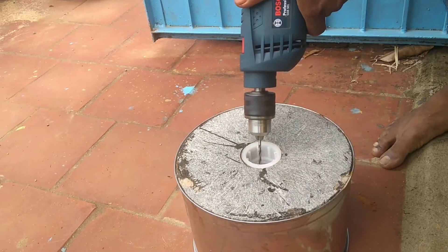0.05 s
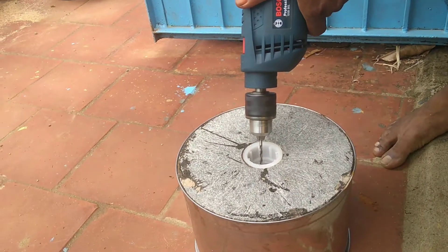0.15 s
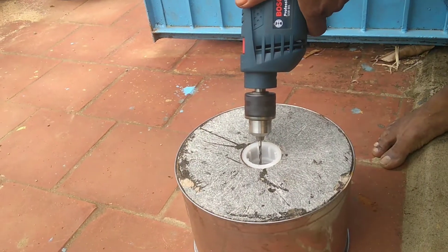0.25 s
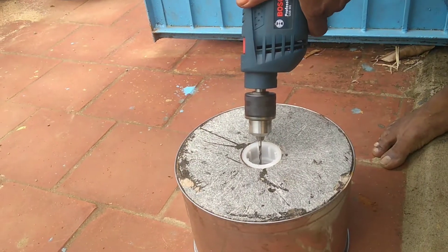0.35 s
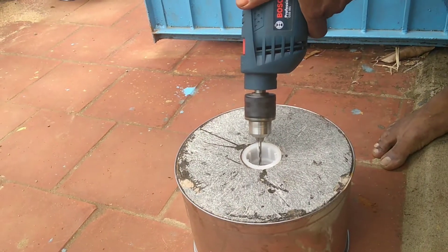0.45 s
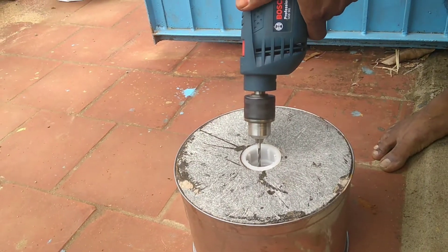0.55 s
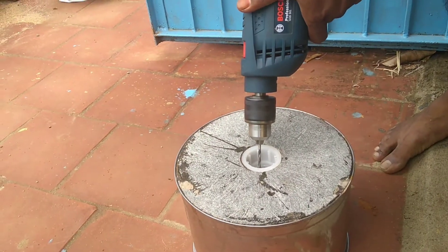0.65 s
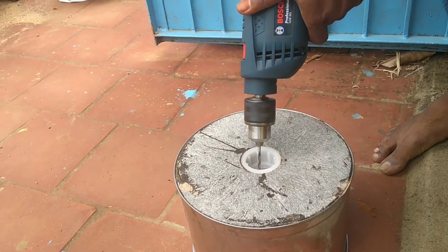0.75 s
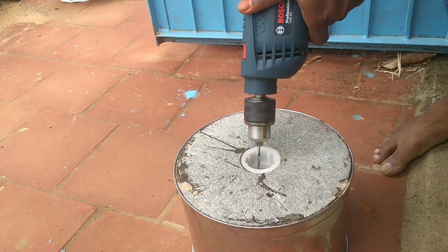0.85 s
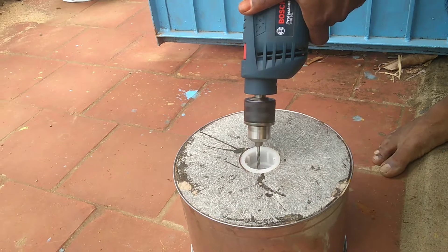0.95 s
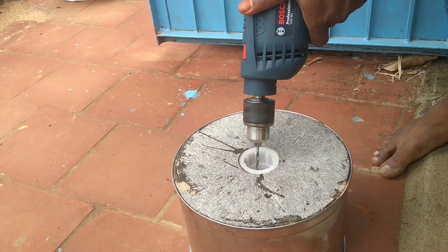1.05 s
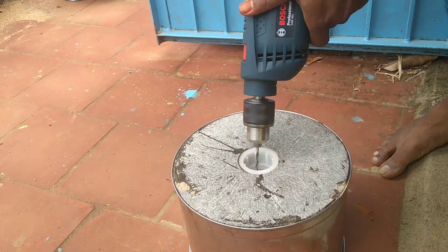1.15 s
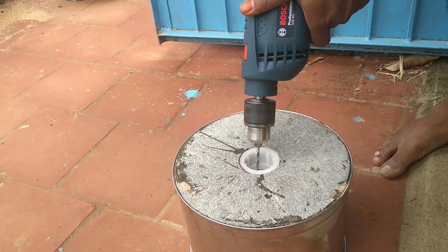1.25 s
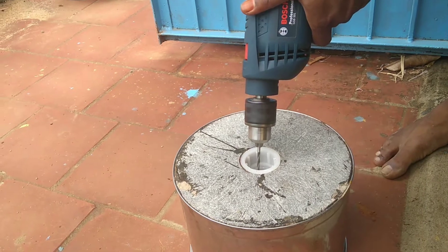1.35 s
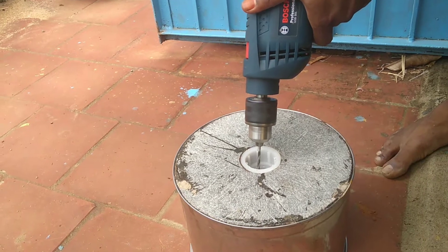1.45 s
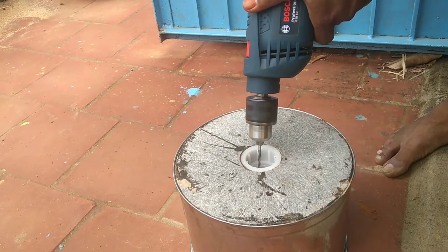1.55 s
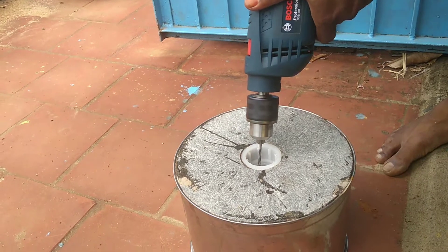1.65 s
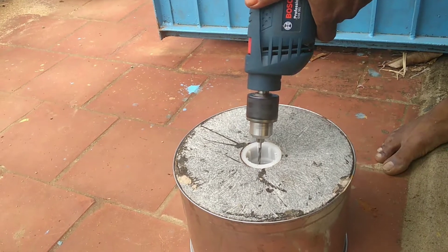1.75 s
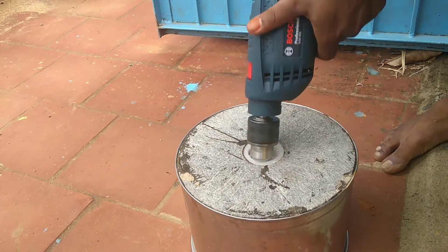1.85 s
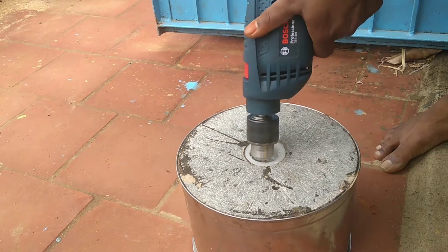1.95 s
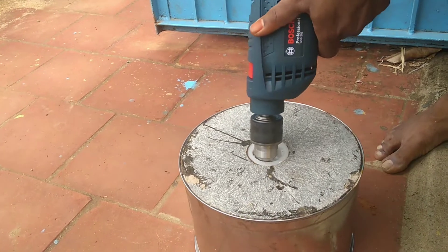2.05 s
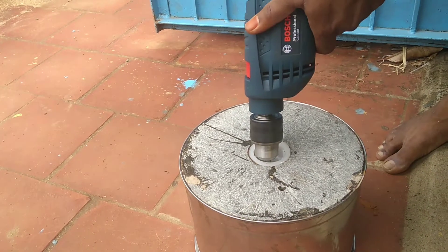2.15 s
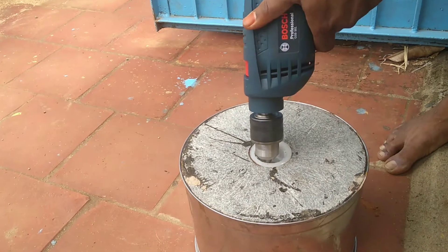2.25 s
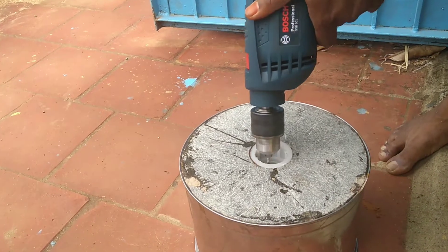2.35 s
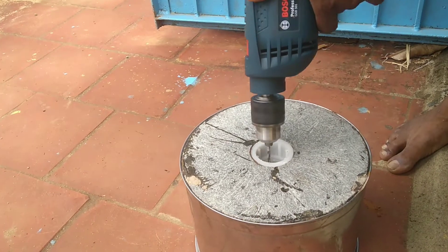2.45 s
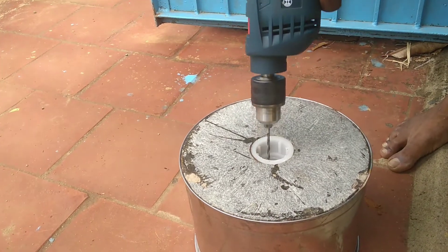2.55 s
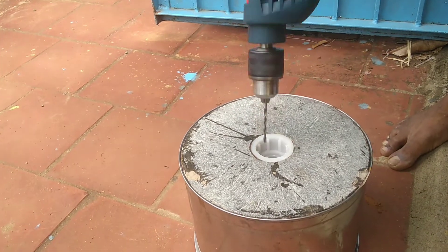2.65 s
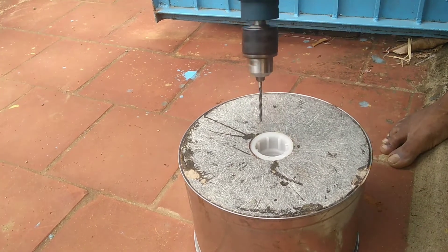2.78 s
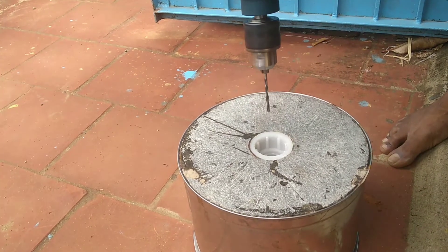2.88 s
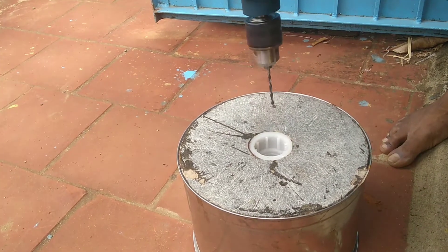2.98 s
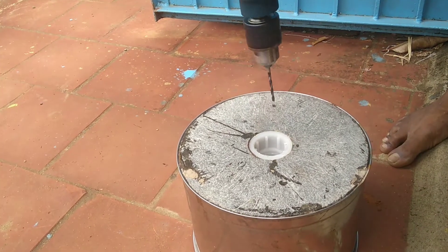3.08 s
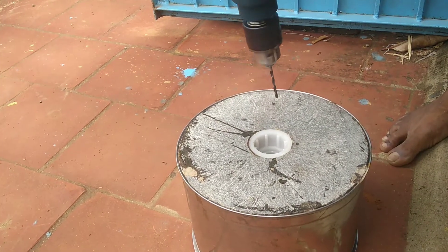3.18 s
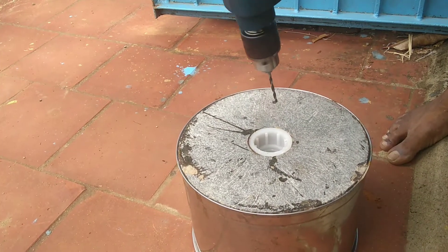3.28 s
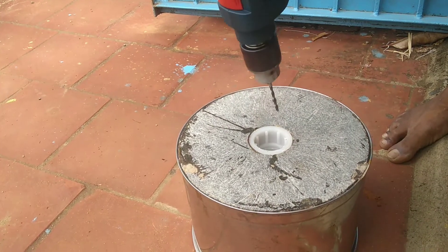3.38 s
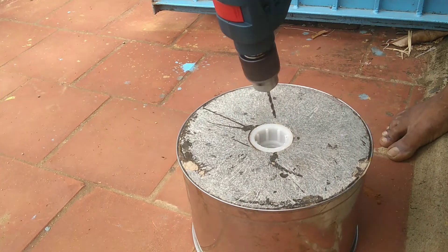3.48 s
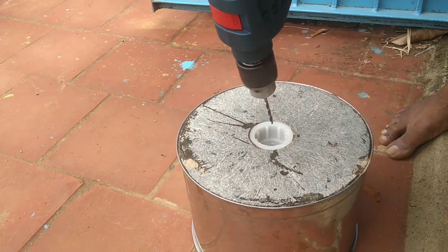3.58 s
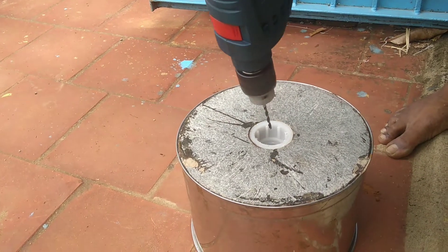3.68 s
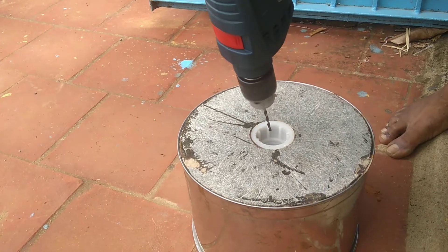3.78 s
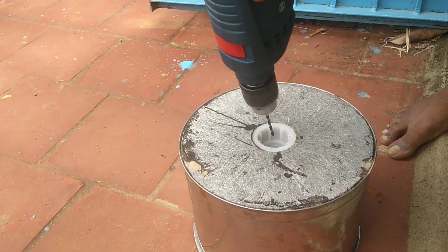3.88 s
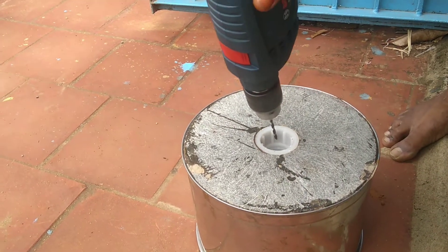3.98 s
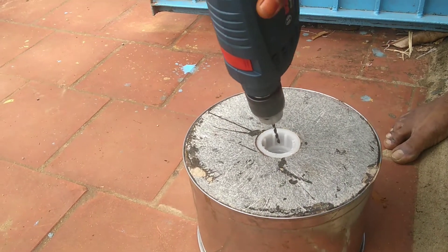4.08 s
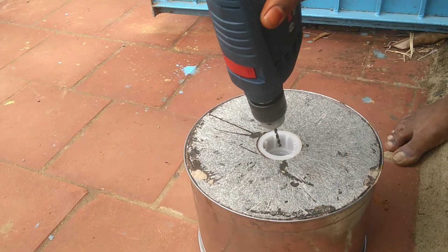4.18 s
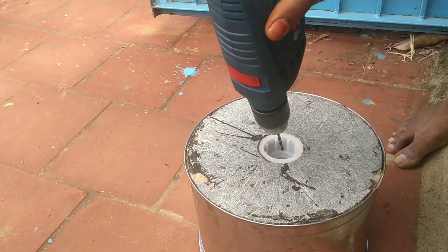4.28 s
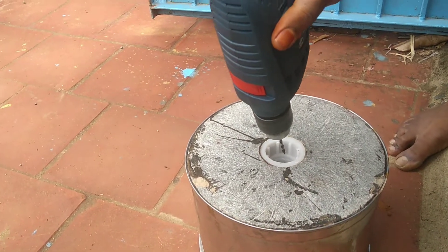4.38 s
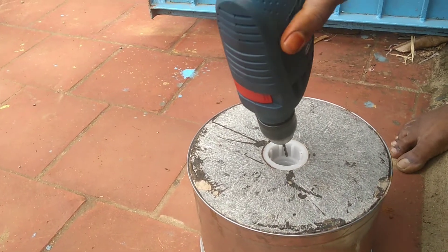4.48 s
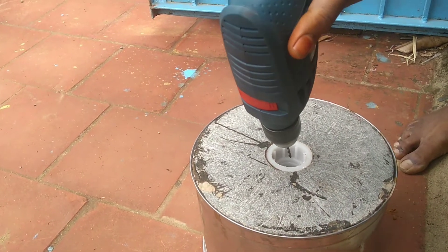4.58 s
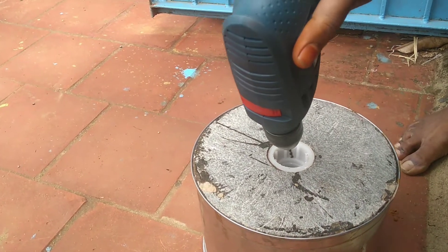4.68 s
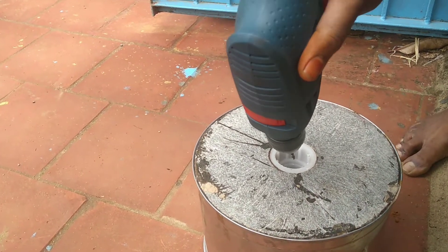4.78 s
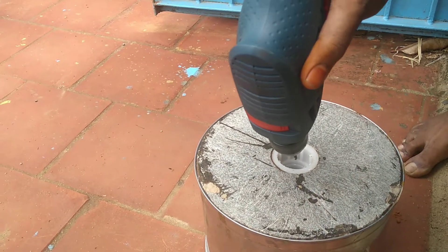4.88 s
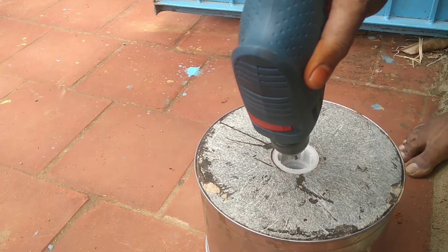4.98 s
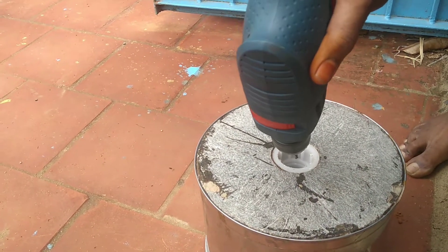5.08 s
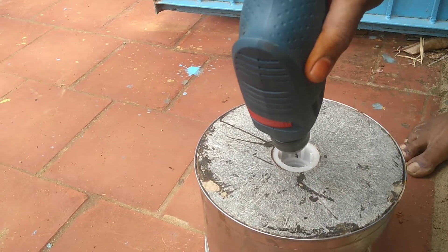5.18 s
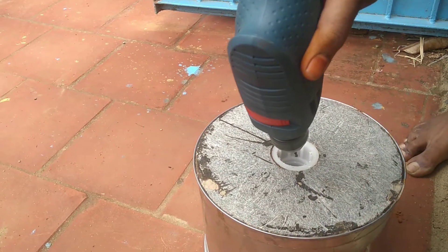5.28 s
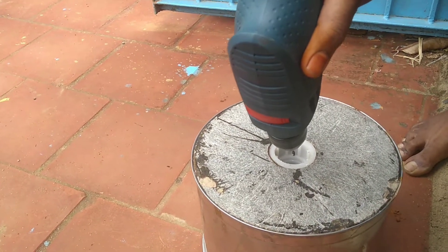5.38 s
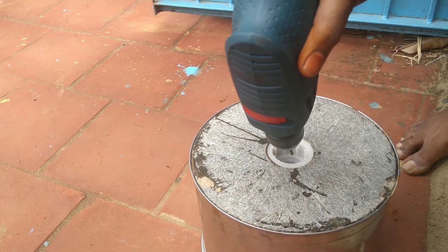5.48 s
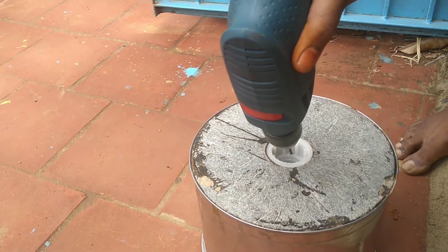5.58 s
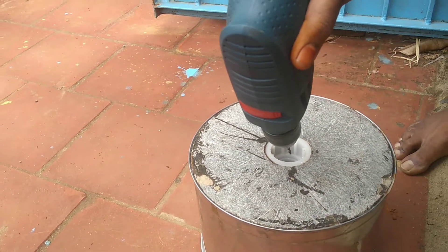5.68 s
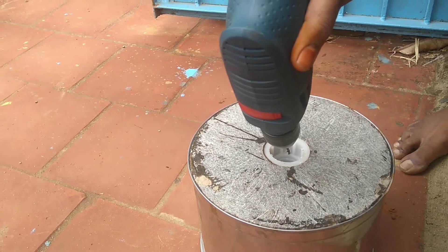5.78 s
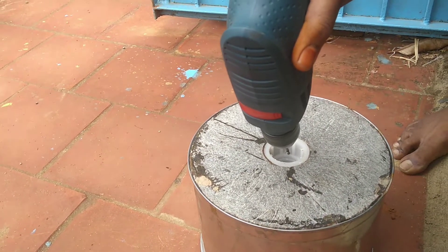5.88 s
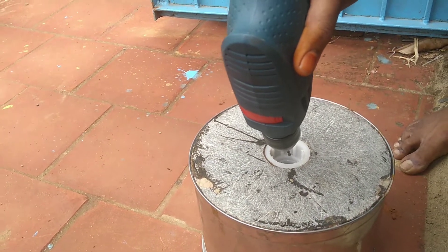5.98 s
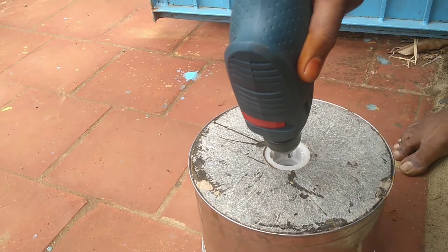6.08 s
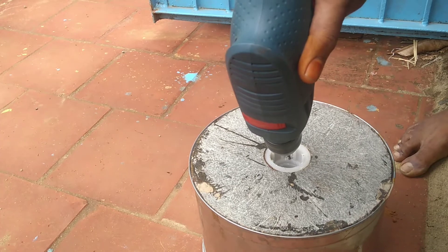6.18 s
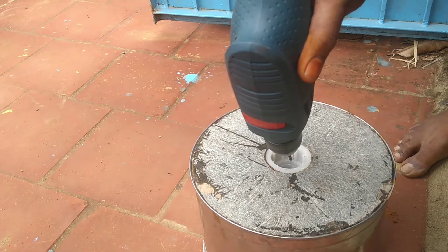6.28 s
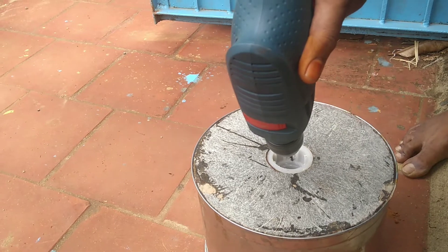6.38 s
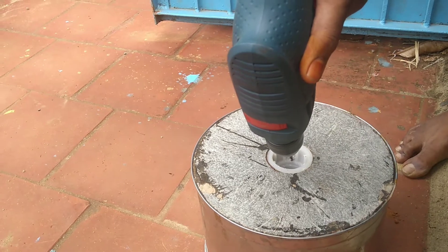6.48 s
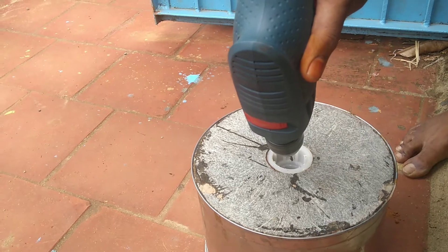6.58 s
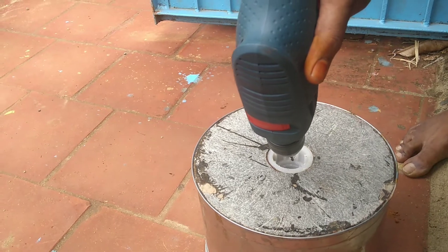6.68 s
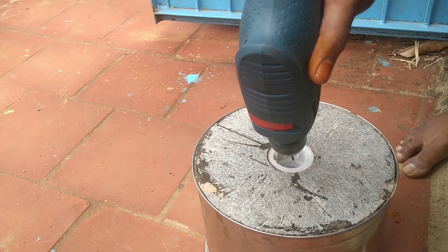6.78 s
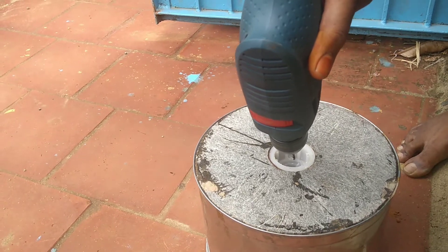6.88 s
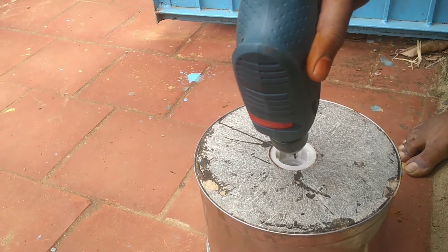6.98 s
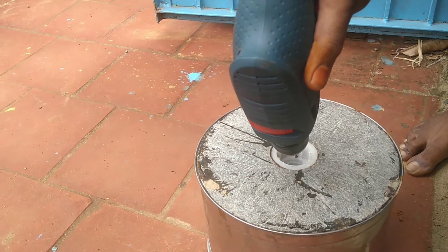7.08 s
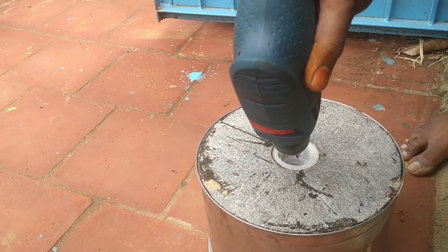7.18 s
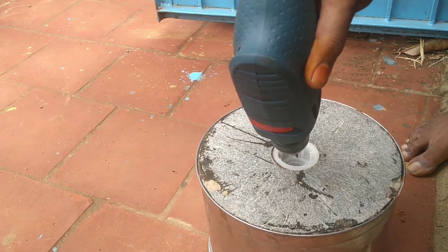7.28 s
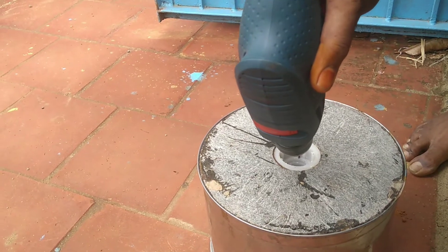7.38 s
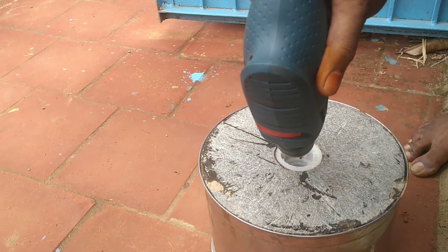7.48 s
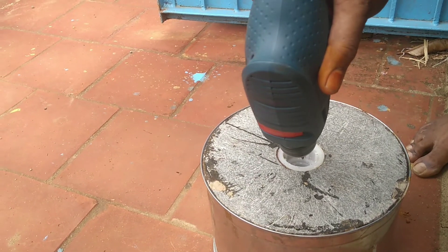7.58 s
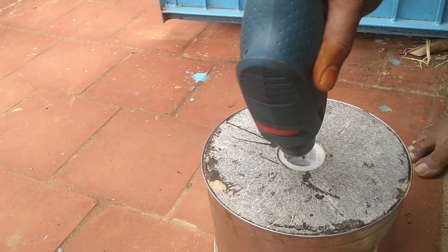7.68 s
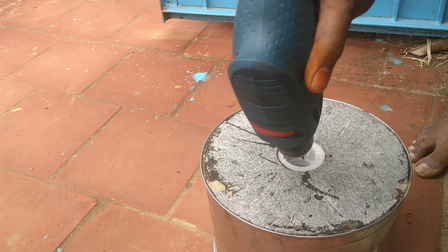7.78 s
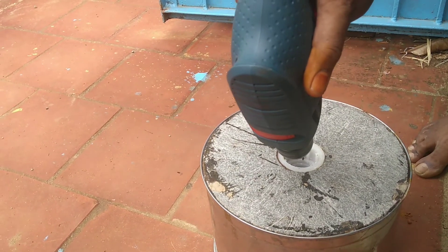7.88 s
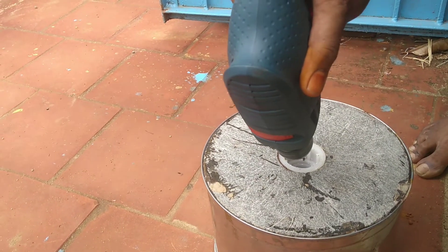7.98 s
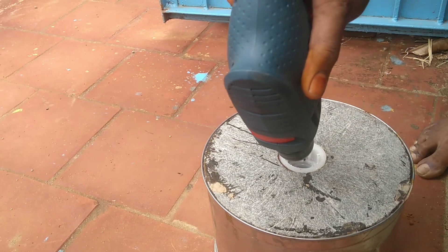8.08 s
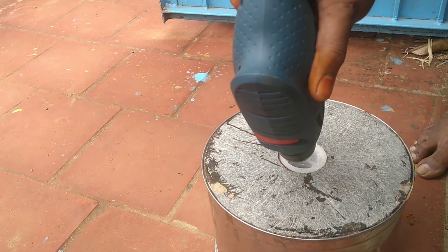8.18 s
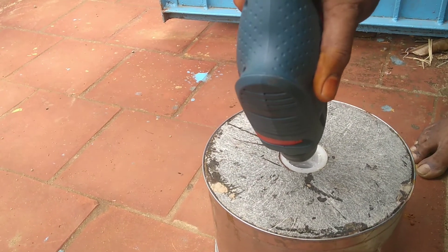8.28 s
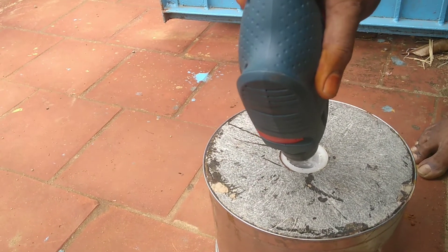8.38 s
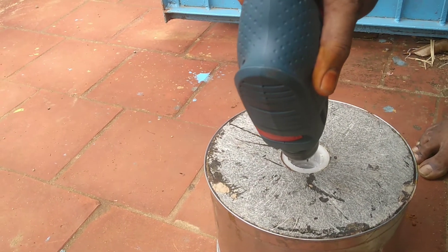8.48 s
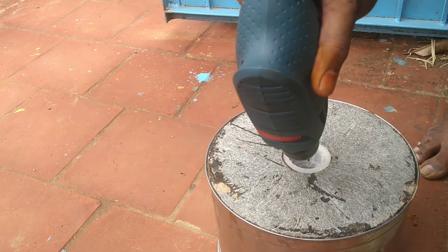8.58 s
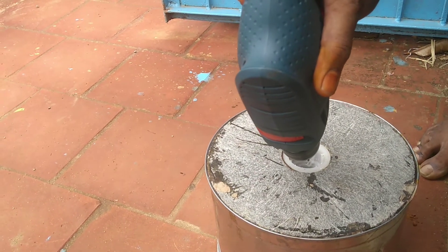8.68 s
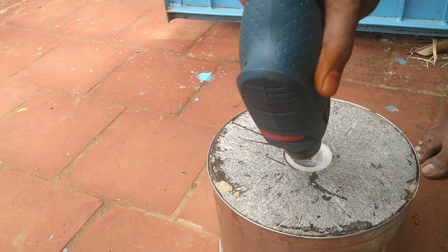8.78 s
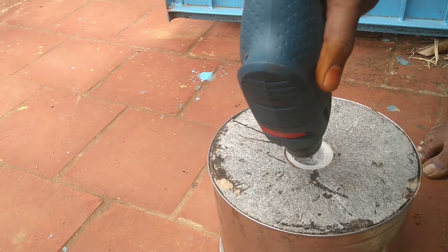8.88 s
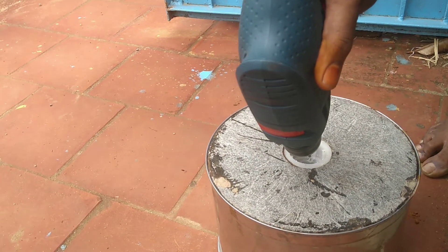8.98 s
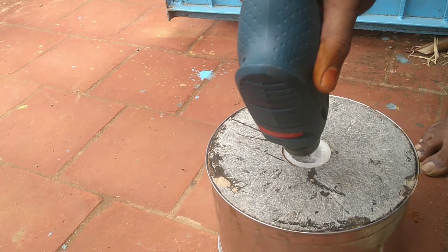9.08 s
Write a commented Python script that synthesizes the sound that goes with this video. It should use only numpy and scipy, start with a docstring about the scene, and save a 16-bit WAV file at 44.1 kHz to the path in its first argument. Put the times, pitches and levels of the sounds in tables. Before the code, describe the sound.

Close handheld electric drill whirring with gear whine and gritty scraping, winding down, clattering sharply back up with a squeal, then labouring under load.

```python
"""On a tiled floor, a mains drill works its bit into the hub of a stone-like drum, close to a phone.
The trigger is let go, the motor coasts far down, kicks back to full speed, sags again and partly recovers.
Noise bursts at the motor's pace make gear rattle, scrape and hiss; sines at multiples of its speed make
gear whine, fan whistle, squeal and hum. Filtered noise makes the drum's drones and groans, fading sines
its knocks, and short swelling cycles the soft handling thuds. Echoes mix into the left channel."""
import sys
import numpy as np
from scipy import signal
from scipy.fft import rfft, irfft
from scipy.io import wavfile
from scipy.ndimage import map_coordinates

SR = 44100
rng = np.random.default_rng(int(sys.argv[2]) if len(sys.argv) > 2 else 0)


def waveform_to_disk(signal):
    """Save audio, clipped to [-1, 1], as 16-bit WAV at the path in sys.argv[1]."""
    frames = np.transpose(np.atleast_2d(signal))
    scaled = np.clip(frames, -1, 1) * 32767
    samples = np.round(scaled).astype(np.int16)
    wavfile.write(sys.argv[1], SR, samples)


N = 403074
TIME = np.arange(N) / SR  # seconds
FREQS_HZ = np.maximum(np.fft.rfftfreq(N, 1 / SR), 1)

# Motor speed while the trigger is held. Each row: time in seconds, speed in turns per second (Hz).
HELD_SPEED = [(0, 418.4), (.27, 409), (.59, 450.7), (.96, 469.2), (1.35, 476.7), (1.8, 418.4), (2.11, 415),
              (2.17, 439.5), (2.32, 429), (2.5, 383.3), (5.74, 442), (5.97, 425), (6.3, 410), (6.8, 400.5),
              (7.35, 398), (7.66, 344.5), (8.1, 305.5), (8.22, 305), (8.44, 342.5), (8.62, 366),
              (8.85, 381), (9.14, 389)]
RELEASE_S, RESTART_S, FULL_SPEED_S = 2.5, 5.175, 5.74
# Slowing by dry drag, and the speed at which air drag equals it.
DRY_DRAG_HZ_PER_S, AIR_DRAG_HZ = 95.4, 363
SPIN_UP_S, FREE_SPEED_HZ, WORKING_HZ = .195, 466, 400
FAN_BLADES, PINION_TEETH, CROWN_TEETH = 39, 4, 42
# The hand swings the drill round, from its side to its back, between these times.
TURN_FROM_S, TURN_TO_S = 2.8, 3.76

# How hard the drill works. Each row: time in seconds, grinding level in dB.
EFFORT = [(0.0, -27), (0.15, -30), (0.25, -27.5), (0.58, -31), (1.07, -24.5), (1.63, -29), (1.88, -25.5),
          (1.99, -32.5), (2.49, -29), (2.92, -31.5), (3.89, -27), (3.92, -26), (4.02, -27), (4.2, -26),
          (4.38, -33.5), (4.76, -31.5), (5.14, -37), (5.19, -27), (5.29, -24), (6.41, -23.5), (8.04, -25.5),
          (8.4, -22.5), (8.73, -25), (8.83, -23), (9.14, -22.5)]
# The bit snags on the rim of the hole and the gear lines swell.
# Each row: peak time in seconds, half length in seconds, lift in dB.
SNAGS = [(3.925, .012, 6.5), (3.98, 0.011, 3), (4.103, 0.013, 0), (4.23, 0.01, 10)]
# How each part follows the effort: level in dB above it, dB gained once turned, dB per dB of motor speed.
RATTLE_LAW = (-0.56, -0.94, -0.12)
SCRAPE_LAW = (-1.1, -0.088, 0.37)
HISS_LAW = (3.32, -3.5, 0.32)
WHINE_LAW = (0, 0, 0.1)
# The rotor's hum, before its own colour and apart from effort: the same three settings.
HUM_LAW = (-45.5, 10.1, 0.84)

# Colour of the gear rattle from the drill's side. Each row: frequency in Hz, relative level in dB.
RATTLE_SIDE = [(180, -56), (340, -1.5), (520, 11.5), (900, 1), (1400, 8), (2200, 6.5), (3200, 6),
               (5000, -26)]
# The duller rattle from its back. Each row: frequency in Hz, relative level in dB.
RATTLE_BACK = [(180, -75), (380, -4), (600, 2.5), (850, 0), (1200, 4), (2200, 3), (3200, -0.5), (5000, -48)]
# Colour of the scraping bit. Each row: frequency in Hz, relative level in dB.
SCRAPE = [(1500, -28), (2800, 6.5), (3400, 11), (4400, -3.5), (5000, 6), (6500, -52)]
# Colour of the brushes and cooling air. Each row: frequency in Hz, relative level in dB.
HISS = [(3000, -16.5), (4200, 2.5), (4900, 0), (6400, 1), (7500, 0), (9300, -1), (11500, -6.5),
        (15500, -13.5)]
# The top of the hiss, which changes with speed. Each row: frequency in Hz, gain in dB.
HISS_TOP = [(6000, -15), (8500, -2.5), (11000, 2.5)]
# Resonances of housing and gearbox. Each row: frequency in Hz, width in Hz, lift in dB.
HOUSING = [(468, 89, -4.5), (715, 114, 4), (1059, 155, 3.5), (1325, 39, 6.5), (1487, 52, 5),
           (1900, 42, 2.5), (2160, 300, 5.5), (3760, 130, 0), (3806, 230, 4), (5600, 58, 6), (5970, 330, 2)]
REPEAT = .25  # share of the clatter's power that comes back with every chuck turn
# The bit rubs once a chuck turn: depth, extra depth when slow, and the motor speed where that sets in.
WOBBLE_DB, SLOW_WOBBLE_DB, WOBBLE_KNEE_HZ = 0.07, 1, 202
BIT_TOUCH_S = 3.925  # a moment when the bit presses hardest in its turn

# Motor and gear-mesh lines. Each row: multiple of the motor speed, relative level in dB from the side,
# relative level in dB from the back, extra phase flutter before the drill is turned in radians.
ORDERS = [(2, -22, -19, 0), (3, -14, -21, .2), (4, -8.5, -18, 0), (5, -13, -16, .3), (6, -19, -21, .3),
          (7, -13, -14, .3), (8, -11, -10, .6), (9, -16, -13, .3), (10, -20, -15, .3), (11, -14, -14, .3),
          (12, -10.5, -12, 0), (13, -18, -19, .3), (16, -19, -18, .3), (20, -19, -18, .3),
          (24, -20, -22, .3)]
# How well the housing radiates those lines. Each row: frequency in Hz, gain in dB.
RADIATION = [(300, -12), (600, -4), (900, -4), (1100, -2), (1400, -5), (1850, 0), (2250, -2), (2600, 2.5),
             (3100, 1), (3600, -2), (6500, -1), (9000, -6)]
# Colour of the rotor's hum. Each row: frequency in Hz, gain in dB.
HUM_COLOUR = [(80, -26), (150, -6), (220, -3), (310, -4.5), (360, -2.5), (420, -2), (470, 2)]

# The bit squeals as it enters the hole and is pressed in. Each row: time in seconds, level in dB.
SQUEAL = [(0, -45), (0.6, -55), (1.6, -52), (1.88, -36), (2.0, -46), (2.4, -42), (3.2, -41), (4.2, -36),
          (4.75, -42), (5.0, -48), (5.5, -42), (5.75, -28), (6.6, -30.5), (7.2, -44), (8.1, -40),
          (9.1, -37)]
# Gear-mesh harmonics that can ring the bit. Each row: multiple of the motor speed, relative level in dB.
MESH = [(8, 0), (12, -2), (16, -3), (20, -1), (24, 1), (32, -9), (36, -9), (48, -8), (60, -9)]
# Resonances of the bit. Each row: frequency in Hz, width in Hz, gain in dB.
BIT_MODES = [(3350, 750, 0), (5900, 1500, -4)]

# Fan level before the vents' colour, and the motor speed around which the fan falls quiet.
WHISTLE_DB, WHISTLE_KNEE_HZ = -31.5, 127
# Colour of the vents. Each row: frequency in Hz, gain in dB.
VENTS = [(3500, -2), (4200, 1), (5600, 3), (7300, 0), (8500, 3), (11000, -3),
         (12000, 0), (14500, 1), (15300, -5), (15600, -20)]
# Bearings and gear mesh hum under side load. Each row: multiple of the motor speed,
# peak time in seconds, half length in seconds, level in dB.
HUMS = [(.565, 5.55, .12, -33), (.365, 5.8, .25, -38), (.372, 6.7, .3, -39), (.56, 7.6, .14, -38),
        (8, 4.6, .2, -39)]

# Gear teeth slap on their slack: a mains-paced series around the restart, and one faint slap
# as the motor sags later. Each row: time in seconds, level in dB before the gearbox colour.
SLAPS = [(5.136, -17), (5.154, -19), (5.175, -10), (5.194, -10), (5.211, -10), (5.233, -10.5), (5.254, -12),
         (5.274, -11.5), (7.776, -29)]
# Colour of the slaps in the gearbox. Each row: frequency in Hz, gain in dB.
SLAP_COLOUR = [(30, -26), (90, -1), (300, 10), (750, 2.5), (1500, -7), (3500, -10), (7000, -23), (14000, -41)]

# The bit leaves the hole and returns; the fade is centred on each moment.
BIT_OUT_S, BIT_IN_S, CONTACT_FADE_S = 2.36, 4.23, 0.78
# The drum's two drones: level in dB, dB gained once the drill is turned.
LOW_DRONE, UPPER_DRONE = (-32, -7), (-42.5, 6.5)
# The bit binds and the drum groans. Each row: peak time in seconds, half length in seconds,
# level in dB before the drum's colour, pitch in Hz, width in Hz.
GROANS = [(1.882, 0.071, -23.5, 215, 70), (1.94, 0.091, -32.5, 600, 190), (2.32, 0.27, -32, 173, 45),
          (4.195, 0.25, -29.5, 185, 45.5), (4.867, 0.16, -30.5, 283, 43.8), (5.517, 0.17, -31.5, 225, 45),
          (7.3, 0.16, -29.5, 180, 45), (8.334, 0.17, -32.5, 276, 45)]
# How the drum radiates a groan. Each row: frequency in Hz, gain in dB.
GROAN_RADIATION = [(70, -7), (150, 3.5)]
# Dull knocks as the bit catches and jolts the drum. Each row: start in seconds,
# level in dB before the drum's colour, time to fade by 60 dB in seconds, hardness in dB per octave.
KNOCKS = [(1.881, -21.5, 0.074, 13), (1.903, -13, 0.055, 5.5), (1.918, -19, 0.046, 14.5),
          (1.989, -26, 0.046, 10), (2.037, -20.5, 0.028, 3), (2.074, -36, 0.053, 16),
          (4.249, -18, 0.07, -14), (4.29, -13.5, 0.099, -24), (7.455, -20.5, 0.052, -10)]
# What the drum rings with when knocked. Each row: frequency in Hz, relative level in dB.
DRUM_MODES = [(122, -26), (190, 7), (255, 0.5), (335, -12), (460, -22), (580, -11), (690, -21), (830, -27)]
# How the small drum radiates a knock. Each row: frequency in Hz, gain in dB.
KNOCK_RADIATION = [(30, -34), (80, -6), (130, 1), (600, -1), (1000, -12)]

# Soft handling thuds of a few cycles. Each row: peak time in seconds, half length in seconds,
# level in dB, pitch in Hz.
THUDS = [(0.096, 0.015, -17.5, 287), (0.117, 0.0031, -9.5, 275), (0.166, 0.0077, -19.5, 393),
         (0.36, 0.0024, -8, 297), (0.47, 0.0037, -9, 235), (0.479, .004, -27, 280),
         (1.045, 0.0058, -18.5, 288), (1.565, 0.003, -17.5, 272), (2.826, 0.0023, -8.5, 240),
         (2.91, 0.0021, -6.5, 462), (2.932, 0.0038, -13.5, 250)]
# Colour of the rumble under each thud. Each row: frequency in Hz, relative level in dB.
RUMBLE = [(40, -34), (80, 3), (130, 10.5), (220, -2), (400, -5.5), (800, -50)]
# Colour of the background noise. Each row: frequency in Hz, relative level in dB.
BACKGROUND = [(30, -14), (85, 15.5), (300, 4), (8000, -23)]
TONE_HZ, TONE_DB = 479, -41.5  # a faint tone of fixed pitch that shows as the motor slows

# Share of the left port's sound that comes straight from the drill.
# Each row: frequency in Hz, share from 0 to 1.
DIRECT = [(100, .98), (200, .95), (450, .9), (750, .96), (1150, .995), (1500, .92), (1780, .76),
          (2050, .88), (2190, .9995), (2440, .9995), (2600, .75), (3000, .72), (3450, .92), (4200, .68),
          (9000, .6), (11000, .45)]
# How much later the left port hears. Each row: frequency in Hz, delay in seconds.
PORT_LAG = [(600, .00053), (1300, .00043), (1900, .00044), (2200, .000454), (2440, .00041), (2550, .000408),
            (3050, .00044), (3700, .000415), (9000, .0004)]
# How much louder the left port hears. Each row: frequency in Hz, gain in dB.
PORT_GAIN = [(100, -.5), (200, -5), (650, -3), (1000, -.3), (1550, .6), (1850, -1), (2200, 0), (2440, 0),
             (2700, -3), (4100, -2.5), (6300, -8), (9000, -9), (13000, -13)]
# The drill leans over the drum and extra echo reaches the left port:
# peak time in seconds, half length in seconds, level in dB before the port's gain.
LEAN = (4.75, .5, -12)
TOP_HZ = 15500


def motor_speed():
    """Let go, the motor coasts against air and dry drag; switched on, it races towards its free speed."""
    held, = curves(HELD_SPEED)
    start = np.arctan(np.interp(RELEASE_S, TIME, held) / AIR_DRAG_HZ)
    coast_s = np.clip(TIME, RELEASE_S, RESTART_S) - RELEASE_S
    coast = AIR_DRAG_HZ * np.tan(start - coast_s * DRY_DRAG_HZ_PER_S / AIR_DRAG_HZ)
    spin_up = np.exp(-np.maximum(TIME - RESTART_S, 0) / SPIN_UP_S)
    free = FREE_SPEED_HZ + (coast - FREE_SPEED_HZ) * spin_up
    return np.where((TIME > RELEASE_S) & (TIME < FULL_SPEED_S), free, held)


def friction(hz, turns):
    """Rattle, scrape and hiss share the effort, and a wobble as the bit rubs once a chuck turn."""
    effort_db, = curves(EFFORT)
    depth_db = WOBBLE_DB + SLOW_WOBBLE_DB / (1 + (hz / WOBBLE_KNEE_HZ) ** 10)
    wobble = undb(depth_db * chuck_swing(turns) + 0.75 * walk(28))
    parts = tooth_rattle(hz, turns) + bit_scrape(hz, turns) + air_hiss(hz, turns)
    return wobble * undb(effort_db) * parts


def tooth_rattle(hz, turns):
    """Each pinion tooth strikes a burst of noise, brighter from the drill's side than from its back."""
    teeth = impacts(turns, count=PINION_TEETH, scatter_db=1.5, ring_s=0.014, hz=hz, repeat=REPEAT)
    teeth = teeth * undb(1.2 * walk(70))
    side = unit(colour(teeth, over_hz(RATTLE_SIDE) + housing_db()))
    back = unit(colour(teeth, over_hz(RATTLE_BACK) + housing_db()))
    return ((1 - turned()) * side + turned() * back) * undb(law_db(RATTLE_LAW, hz))


def bit_scrape(hz, turns):
    """The bit scrapes in very short bursts at the pace of the pinion teeth."""
    bit = impacts(turns, count=PINION_TEETH, scatter_db=2.5, ring_s=0.0025, hz=hz, repeat=REPEAT)
    bit = bit * undb(walk(60))
    return unit(colour(bit, over_hz(SCRAPE) + housing_db())) * undb(law_db(SCRAPE_LAW, hz))


def air_hiss(hz, turns):
    """Brushes and cooling air hiss in soft pulses once a motor turn."""
    brushes = impacts(turns, count=1, scatter_db=0.66, ring_s=0.017, hz=hz) * undb(.5 * walk(24))
    hiss = unit(colour(brushes, over_hz(HISS) + housing_db()))
    top = colour(hiss, over_hz(HISS_TOP))
    hiss = hiss + top * (np.minimum(hz / 400, 1.2) ** 0.56 - 1)  # slow air loses its top
    return hiss * undb(law_db(HISS_LAW, hz))


def gears(hz, turns):
    """Motor and mesh lines glide through the housing's resonances; slack teeth make them chatter."""
    back = turned()
    lines = 0
    for order, side_db, back_db, flutter in ORDERS:
        level = undb(side_db + (back_db - side_db) * back)
        smear = .45 + flutter * (1 - back)
        lines = lines + level * line(order, hz, turns, waver_db=2.4, smear=smear)
    pulse = unit(undb(4 * back * chuck_swing(turns)))  # once a chuck turn, as the drill is turned
    chatter = (1 + .35 * walk(90)) * pulse
    whine = colour(lines * chatter, housing_db() + over_hz(RADIATION))
    return whine * undb(effort() + law_db(WHINE_LAW, hz)) + rotor_hum(hz, turns)


def rotor_hum(hz, turns):
    """The unbalanced rotor hums at almost exactly once a turn."""
    unbalance = line(0.99, hz, turns, waver_db=2.5, smear=0.12) * undb(law_db(HUM_LAW, hz))
    return colour(unbalance, over_hz(HUM_COLOUR))


def squeal(hz, turns):
    """Mesh harmonics ring the bit as they glide through its resonances, in pulses once a chuck turn."""
    squeal_db, = curves(SQUEAL)
    mesh = sum(undb(db) * line(order, hz, turns, waver_db=1.2, smear=.7) for order, db in MESH)
    ring = sum(undb(db) / (1 + (2 * (FREQS_HZ - centre) / width) ** 4)
               for centre, width, db in BIT_MODES)
    throb = unit(undb(9 * chuck_swing(turns) + 1.5 * walk(150)))
    return colour(mesh, 20 * np.log10(ring)) * throb * undb(squeal_db)


def fan(hz, turns):
    """Passing blades whistle with a thin octave; eddies roughen the whistle and the vents colour both."""
    eddies = undb(2.5 * walk(35)) * (1 + .45 * walk(450))
    blades = line(FAN_BLADES, hz, turns, waver_db=2.5, smear=.8) * eddies
    octave = line(2 * FAN_BLADES, hz, turns, waver_db=2, smear=.7) * undb(-13)
    whistle = colour(blades + octave, over_hz(VENTS))
    return whistle * undb(WHISTLE_DB) / (1 + (WHISTLE_KNEE_HZ / hz) ** 3)


def hums(hz, turns):
    """Tones that follow the motor, swelling and fading as the drill leans."""
    return sum(line(order, hz, turns, waver_db=2.5, smear=0.24) * undb(db) * swell(s, half)
               for order, s, half, db in HUMS)


def slaps(t60=0.07):
    """Hard blows of the teeth clatter through the gearbox as fading bursts of noise."""
    blows = sum(undb(db) * (TIME >= s) * undb(-60 * np.abs(TIME - s) / t60) for s, db in SLAPS)
    return colour(blows * noise() * undb(2 * walk(500)), over_hz(SLAP_COLOUR) + housing_db())


def drum():
    """While the bit is in the hole it shakes the drum: rough, low drones."""
    outside_s = np.maximum(BIT_OUT_S - TIME, TIME - BIT_IN_S)
    contact = np.clip(outside_s / CONTACT_FADE_S + .5, 0, 1)
    low_db, upper_db = (db + turned_db * turned() + 2.0 * walk(7.8)
                        for db, turned_db in (LOW_DRONE, UPPER_DRONE))
    low = drone(hz=186, width=88)
    upper = drone(hz=274.0, width=58) + undb(-7.5) * drone(hz=460, width=160)
    return contact * (low * undb(low_db) + upper * undb(upper_db))


def drone(hz, width):
    """A low resonance of the drum, rubbed unevenly: noise in a narrow band."""
    return unit(colour(noise(), -20 * np.log10(1 + (2 * (FREQS_HZ - hz) / width) ** 2)))


def groans():
    """Each time the bit binds, a rough low note swells and fades; the drum radiates little of its bass."""
    notes = sum(drone(hz, width) * undb(db) * swell(s, half) for s, half, db, hz, width in GROANS)
    return colour(notes, over_hz(GROAN_RADIATION))


def knocks(rise_s=.0014, rough=.25):
    """Each jolt is a soft push and a short, rough ring of the drum's modes, with little deep bass."""
    out, t = np.zeros(N + SR), TIME[:SR // 4]
    main_hz = DRUM_MODES[1][0]
    for s, db, t60, hardness_db in KNOCKS:
        shape = (1 - np.exp(-t / rise_s)) ** 2 * undb(-60 * t / t60)
        ring = 0
        for hz, mode_db in DRUM_MODES:
            level = undb(mode_db + hardness_db * np.log2(hz / main_hz))  # a hard blow favours high modes
            ring = ring + level * np.sin(2 * np.pi * hz * t)
        start = max(int(s * SR), 0)
        out[start:start + len(t)] += undb(db) * shape / shape.max() * ring
    return colour(out[:N] * (1 + rough * walk(420)), over_hz(KNOCK_RADIATION))


def thuds(rumble_db=-20, rumble_s=0.07):
    """Each handling thud is a few uneven cycles inside a longer, low rumble."""
    drift = .35 * walk(250)  # radians
    rumble = unit(colour(noise(), over_hz(RUMBLE))) * undb(rumble_db)
    out = 0
    for s, half, db, hz in THUDS:
        cycles = swell(s, half) * np.cos(2 * np.pi * hz * (TIME - s) + drift)
        out = out + undb(db) * (cycles + swell(s, rumble_s) * rumble)
    return out


def background():
    """Faint, mostly low noise, with a tone of fixed pitch that swells and fades."""
    low_noise = unit(colour(noise(), over_hz(BACKGROUND))) * undb(-46.0)
    tone = np.sqrt(2) * np.sin(2 * np.pi * TONE_HZ * TIME)
    return low_noise + undb(TONE_DB) * swell(4.8, half=0.7) * tone


def echoes(x, t60=.4, drift_hz=3, count=3):
    """Echoes from floor and gate, as fading noise; their mix shifts as the drill moves in the hand."""
    shares = np.array([walk(drift_hz) for _ in range(count)])
    shares /= np.sqrt(np.sum(shares ** 2, axis=0))
    tails = [noise() * undb(-60 * TIME / t60) for _ in range(count)]
    return sum(share * irfft(rfft(x) * rfft(tail), N) / np.sqrt(np.sum(tail ** 2))
               for share, tail in zip(shares, tails))


def ports(x):
    """The left port is flipped, later, duller and more echoing; near 2.3 kHz the two ports oppose."""
    share, room = over_hz(DIRECT), echoes(x)
    delay = np.exp(-2j * np.pi * FREQS_HZ * over_hz(PORT_LAG))
    direct = rfft(x) * share * delay
    s, half, db = LEAN
    diffuse = rfft(room) * np.sqrt(1 - share ** 2) + rfft(room * undb(db) * swell(s, half))
    left = -irfft((direct + diffuse) * undb(over_hz(PORT_GAIN)), N)
    return np.array([left, x])


def impacts(turns, count, scatter_db, ring_s, hz, repeat=0):
    """Fading noise bursts, count a turn, each its own size; a share repeats every CROWN_TEETH bursts."""
    tooth = turns * count
    number, phase = tooth.astype(int), tooth % 1
    size = undb(scatter_db * rng.standard_normal(N))[number]
    span = 1 / (count * hz * ring_s)  # gap between blows, in ring times
    burst = np.exp(-phase * span) / np.sqrt((1 - np.exp(-2 * span)) / (2 * span))  # even power
    place = (number % CROWN_TEETH) * 1024 + phase * SR / (count * hz)  # where each tooth's noise is kept
    worn = map_coordinates(noise(), [place], order=2)
    return size * burst * (np.sqrt(1 - repeat) * noise() + np.sqrt(repeat) * worn)


def line(order, hz, turns, waver_db, smear):
    """A sine at a multiple of the motor speed, wavering in size and phase."""
    audible = np.clip((SR * .45 - order * hz) / 1000, 0, 1)  # fade out before the highest pitch possible
    phase = 2 * np.pi * order * turns + smear * walk(70)
    return audible * undb(waver_db * walk(9)) * np.sqrt(2) * np.sin(phase)


def chuck_swing(turns):
    """Once a chuck turn the bit presses (1) and eases off (-1)."""
    since_touch = turns - np.interp(BIT_TOUCH_S, TIME, turns)
    return np.cos(2 * np.pi * since_touch * PINION_TEETH / CROWN_TEETH)


def housing_db():
    """Lift that the housing's resonances give each frequency."""
    return sum(db / (1 + (2 * (FREQS_HZ - hz) / width) ** 2) for hz, width, db in HOUSING)


def effort():
    """Level in dB that drives the gear lines: the grinding effort with a brief lift at each snag."""
    return curves(EFFORT)[0] + sum(db * swell(s, half) for s, half, db in SNAGS)


def turned():
    """How far the drill has been swung round, 0-1."""
    return np.clip((TIME - TURN_FROM_S) / (TURN_TO_S - TURN_FROM_S), 0, 1)


def law_db(law, hz):
    """Level of a part, from the way the drill faces and the motor speed."""
    db, turned_db, slope = law
    return db + turned_db * turned() + slope * 20 * np.log10(hz / WORKING_HZ)


def swell(s, half):
    """A bell-shaped rise and fall; one half length from its peak it is down to 37 percent."""
    return np.exp(-np.minimum(((TIME - s) / half) ** 2, 60))


def walk(rate):
    """Smooth chance with spread near 1, changing rate times a second."""
    points = rng.standard_normal(4096)
    return map_coordinates(points, [TIME * rate], order=2, mode="wrap")


def noise():
    """White noise."""
    return rng.standard_normal(N)


def colour(x, db):
    """Filter by a gain in dB for each frequency."""
    return irfft(rfft(x) * undb(db), N)


def unit(x):
    """Scale to an average (rms) level of 1."""
    return x / np.sqrt(np.mean(x ** 2))


def over_hz(points):
    """A frequency table joined by straight lines on a log frequency axis."""
    hz, values = np.transpose(points)
    return np.interp(np.log(FREQS_HZ), np.log(hz), values)


def curves(table):
    """The columns of a time table, one value per sample."""
    s, *columns = np.transpose(table)
    return [np.interp(TIME, s, c) for c in columns]


def undb(db):
    """Decibels to gain."""
    return 10 ** (np.asarray(db) / 20)


def scene():
    """One shaft drives the drill's parts; drum, thuds and a faint background join them."""
    hz = motor_speed() * (1 + .0012 * walk(22))
    turns = np.cumsum(hz) / SR
    drill = friction(hz, turns) + gears(hz, turns) + squeal(hz, turns)
    drill = drill + fan(hz, turns) + hums(hz, turns) + slaps()
    return ports(drill + drum() + groans() + knocks() + thuds() + background())


def record(dry):
    """The phone rounds the loudest peaks and cuts the top."""
    rounded = .85 * np.tanh(dry / .85)
    low_pass = signal.ellip(10, .2, 80, TOP_HZ, fs=SR, output="sos")
    return signal.sosfilt(low_pass, rounded)


dry = scene()
out = record(dry)
waveform_to_disk(out)
```